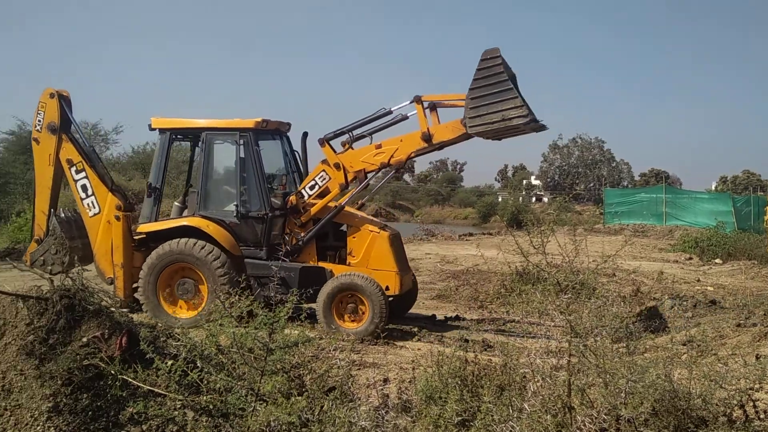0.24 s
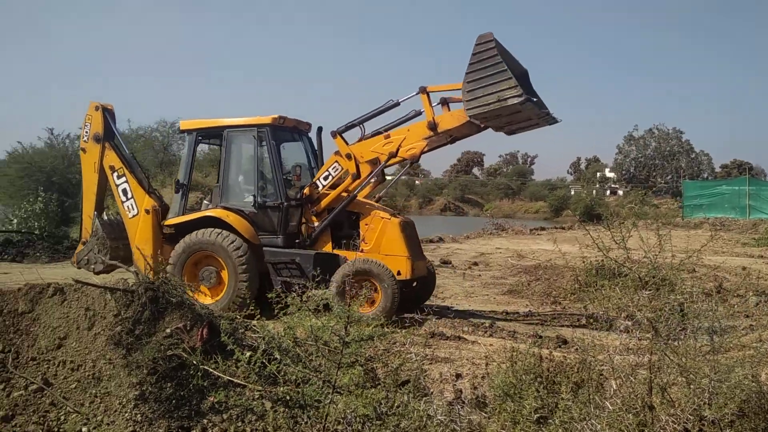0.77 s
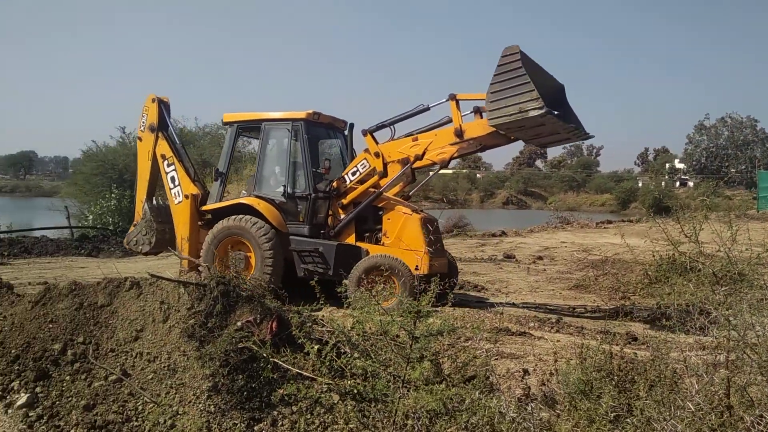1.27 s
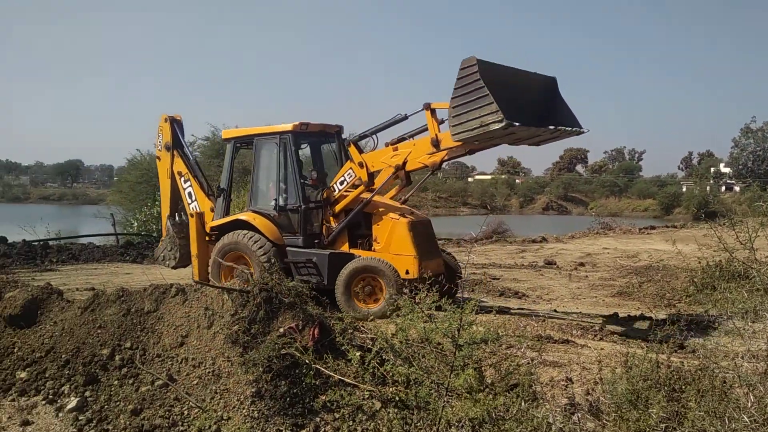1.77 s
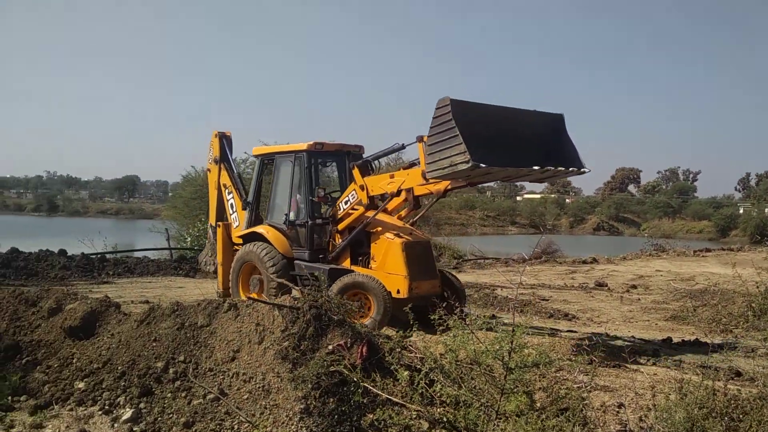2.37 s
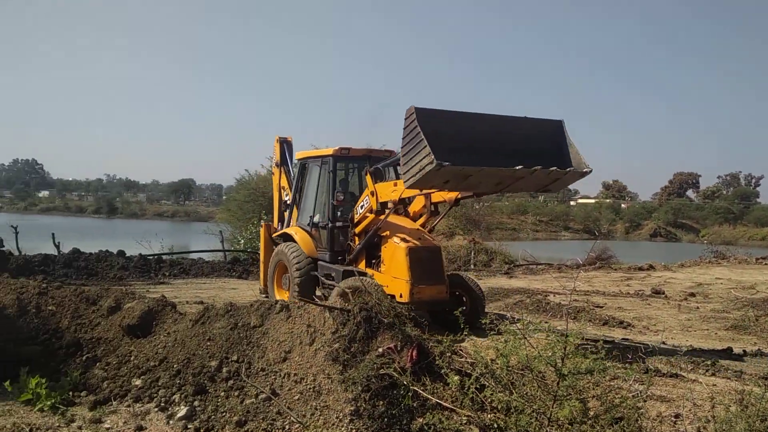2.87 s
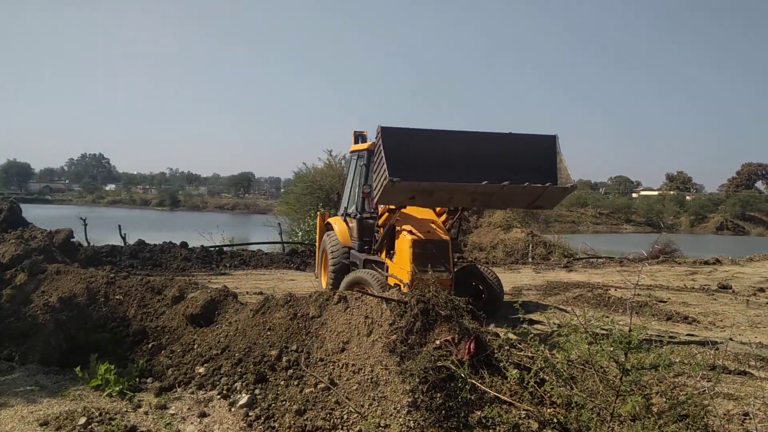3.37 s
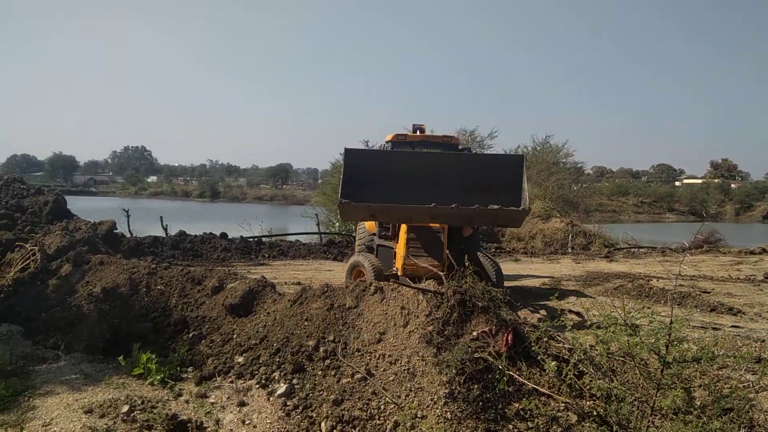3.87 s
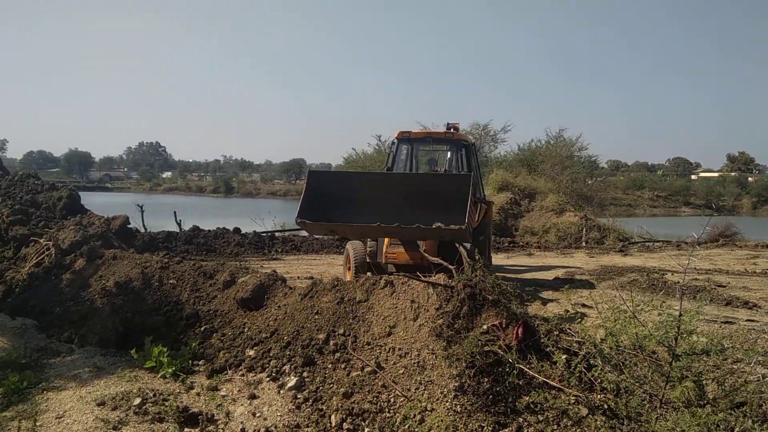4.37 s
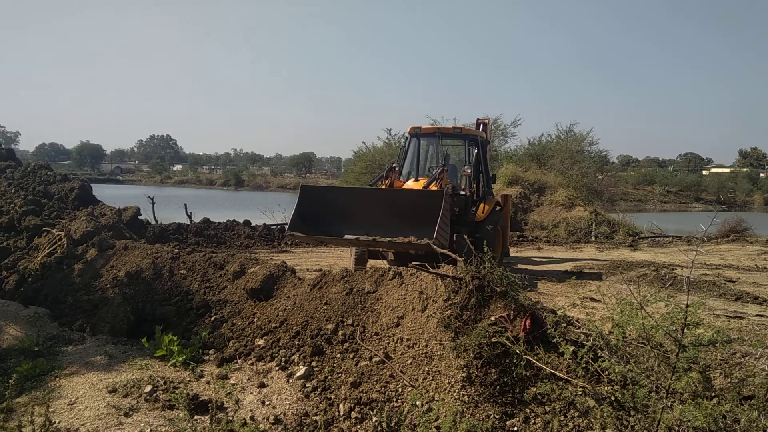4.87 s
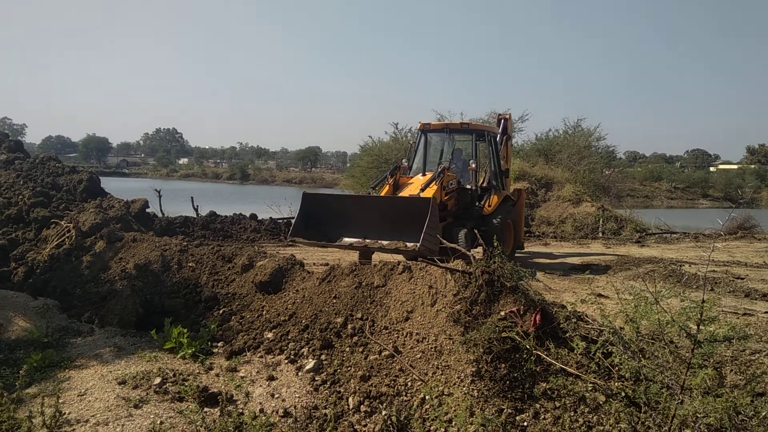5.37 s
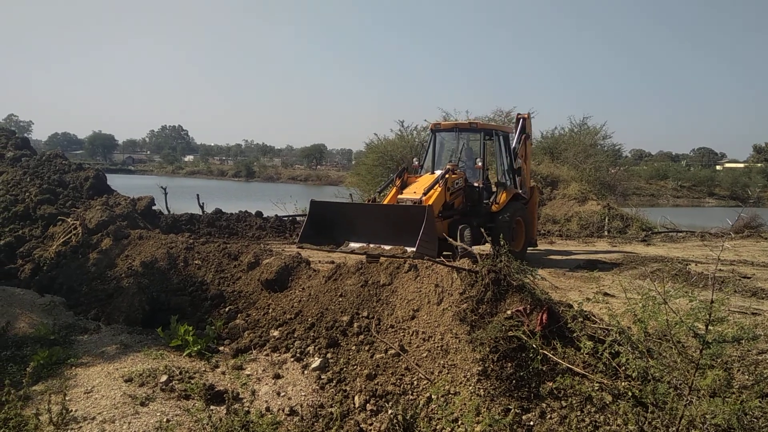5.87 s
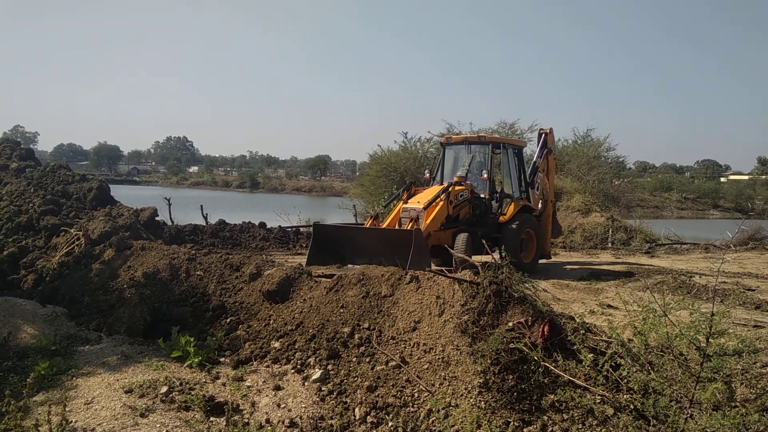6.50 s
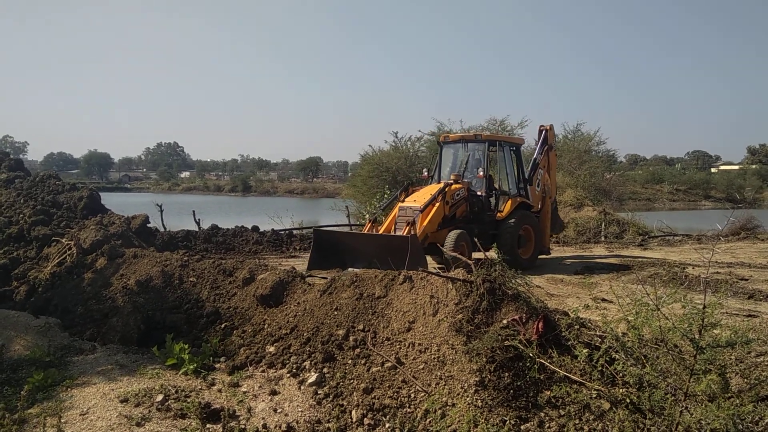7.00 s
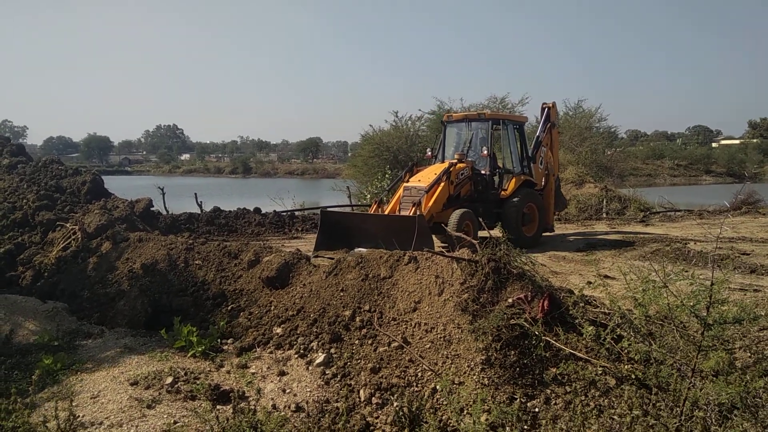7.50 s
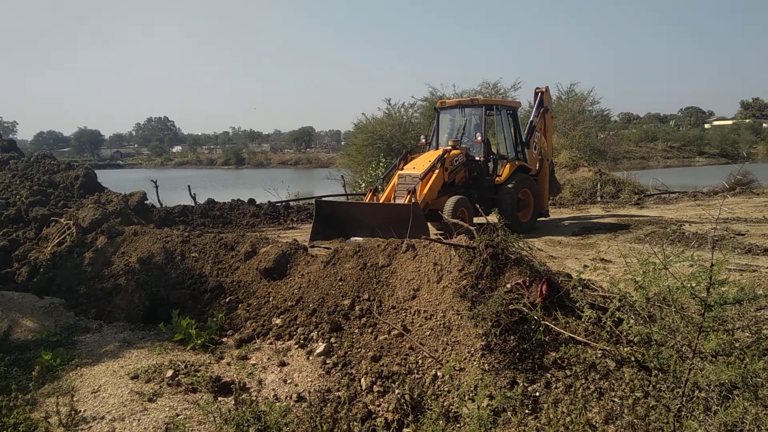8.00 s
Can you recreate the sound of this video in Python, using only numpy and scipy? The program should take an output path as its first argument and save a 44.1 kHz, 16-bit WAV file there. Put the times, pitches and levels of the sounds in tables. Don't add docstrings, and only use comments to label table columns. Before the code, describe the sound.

A four-cylinder diesel loader reverses on open soil some metres away, with fast low exhaust pulses, metallic knocking, gas hiss and a faint wavering gear whine. Around two and a half seconds it revs hard and spits, then falls through four seconds to a slow, uneven idle. Bucket and pins clank twice, then rattle sharply near seven seconds. Wind thumps the open stereo microphone, and dry stalks tick close by.

```python
import sys
import numpy as np
from scipy import signal
from scipy.fft import rfft, irfft, next_fast_len
from scipy.io import wavfile
from scipy.ndimage import uniform_filter1d

SR = 44100
rng = np.random.default_rng(int(sys.argv[2]) if len(sys.argv) > 2 else 0)


def generate_wav(signal):
    frames = np.transpose(np.atleast_2d(signal))
    scaled = np.clip(frames, -1, 1) * 32767
    pcm = np.round(scaled).astype(np.int16)
    wavfile.write(sys.argv[1], SR, pcm)


def linear_from_db(decibels):
    return 10 ** (np.asarray(decibels, float) / 20)


N = 363825
TAU = 2 * np.pi
FLANK_CYLINDERS_DB = [-3.5, -2, -9, -13]


def rms_one(x):
    return x / np.sqrt(np.mean(x ** 2) + 1e-20)


def in_time(rows):
    s, *columns = np.transpose(rows)
    return [np.interp(np.arange(N) / SR, s, c) for c in columns]


def at_hz(points, hz):
    points_hz, values = np.transpose(points)
    return np.interp(np.log(hz), np.log(points_hz), values)


def drift(rate_hz):
    r = np.exp(-80 * np.pi * rate_hz / SR)
    slow = signal.lfilter([1], [1, -2 * r, r * r], rng.standard_normal(N // 40 + 2002))[2000:]
    return np.interp(np.arange(N) / 40, np.arange(len(slow)), rms_one(slow))


def shaped(x, points):
    size = next_fast_len(N + SR // 10)
    hz = np.fft.rfftfreq(size, 1 / SR) + 1
    return irfft(rfft(x, size) * linear_from_db(at_hz(points, hz)), size)[..., :N]


def band(x, order, low_hz, high_hz):
    return signal.sosfilt(signal.butter(order, [low_hz, high_hz], "band", fs=SR, output="sos"), x)


def resonance(x, hz, width_hz):
    r = np.exp(-np.pi * width_hz / SR)
    poles = [1, -2 * r * np.cos(TAU * hz / SR), r * r]
    return signal.lfilter([(1 - r * r) / 2, 0, (r * r - 1) / 2], poles, x)


def bursts(times_s, gains, t60_s):
    clicks = np.zeros(N) + 1e-18
    np.add.at(clicks, np.minimum((np.asarray(times_s) * SR).astype(int), N - 1), gains)
    return signal.lfilter([1], [1, -linear_from_db(-60 / (t60_s * SR))], clicks)


def wind():
    # t/s, rms level/dB, flutter over thump/dB, port (0 left - 1 right)
    gusts = [(0.032, -17, -10, 0.78), (0.276, -19, -25, 1), (0.691, -17, -18, .95), (0.866, -11, -26, 0.97),
             (1.077, -6.5, -26, 1), (1.557, -10, -21, 0.87), (1.678, -12, -23, 0.45), (2.35, -11, -5, 0.85),
             (2.592, -12, -22, 0.043), (2.666, -9, -12, 0.5), (5.221, -18, -26, 0.28), (5.9, -24, -3, .05),
             (5.922, -13.5, -5, 0.046), (6.215, -27, -22, 0.44), (6.241, -23, -5, .15),
             (6.353, -14.5, -5, 0.082), (6.427, -13, -25, 0.78), (6.527, -14.5, -27, 0.88),
             (6.811, -12, -19, 1), (6.546, -19, -16, 0.7), (6.945, -16.5, 1, 0.59), (6.977, -24, 1, .5),
             (7.079, -27, -25, 0.98), (7.137, -11, -31, 1), (7.22, -22.5, 2, 1), (7.263, -10.5, -15, 1),
             (7.348, -13, 1, 0.027), (7.371, -18, 2.5, .03), (7.503, -21, -25, 0.25),
             (7.636, -23.5, -1, .1), (7.663, -19, -25, .03), (7.689, -22, -11, .1), (7.737, -18, -24, .05),
             (7.959, -20, -10, .05), (7.984, -19, -7, .05), (8.096, -22, -4, .15),
             (8.111, -14.5, -10, 0.17), (8.166, -14, -30, 0.72)]
    thump, flutter = rng.standard_normal((2, 2, N))
    thump = rms_one(band(thump, 2, 10, 140))
    flutter = rms_one(band(flutter, 3, 90, 360))
    out = linear_from_db(-35 + 3.3 * np.array([drift(5.3), drift(11.0)])) * thump
    t = np.arange(N) / SR
    thump_swing = .7
    for (s, db, flutter_db, port), hz in zip(gusts, rng.uniform(42, 75, 60)):
        port = np.clip(port, 0, 1)
        layers = ((thump, db, 1300, thump_swing), (flutter, db + flutter_db, 700, 0))
        for noise, level_db, half, swing in layers:
            i = np.arange(max(round(s * SR) - half, 0), min(round(s * SR) + half, N))
            swell = np.cos((i - s * SR) / half * np.pi / 2) ** 2
            lump = (1 - swing) * noise[:, i] - swing * np.sin(TAU * hz * (t[i] - s))
            lump = lump / np.sqrt(np.average(lump ** 2, axis=1, weights=swell ** 2))[:, None]
            out[:, i] += linear_from_db(level_db - 2.5) * swell * lump * [[1 - port], [port]]
    return out


def ticks():
    # t/s, peak level/dB
    snap_rows = [(4.279, -24), (4.2954, -33), (4.3355, -24), (4.3424, -29), (4.5104, -33), (4.5674, -34),
                 (4.6508, -34), (4.6634, -42), (7.1277, -43), (7.3477, -26), (7.3896, -30), (7.5122, -37)]
    # t/s, length/s, level/dB
    rustle_rows = [(7.726, .03, -64), (7.928, 0.079, -55), (8.033, 0.032, -64), (8.118, 0.057, -51.5)]
    s, db = np.transpose(snap_rows)
    t = np.arange(N) / SR
    stir = sum(linear_from_db(level_db) * np.exp(-((t - when) / length) ** 2) for when, length, level_db in rustle_rows)
    envelope = bursts(s, linear_from_db(db + 2.5), t60_s=0.013) + 3 * stir * linear_from_db(2.8 * drift(60))
    return band(envelope * rng.standard_normal((2, N)), 2, 7000, 16000)


def clanks():
    # t/s, peak level/dB, ring f/Hz, ring t60/s, crack over ring/dB
    clank_rows = [(0.297, -24, 1250, 0.12, 12.5), (1.261, -15.5, 1150, 0.13, -30),
                  (3.947, -17, 1150, 0.31, -22), (3.997, -21, 1190, 0.39, -18),
                  (6.9368, -9, 2320, 0.04, -8), (6.944, -14.5, 2250, 0.1, -5), (6.947, -18, 800, .04, -6),
                  (6.958, -21, 1600, .05, -6), (7.013, -24, 2480, 0.055, -2), (6.986, -24, 1500, 0.096, 5)]
    out, age = np.zeros((2, N)), np.arange(9000) / SR
    for s, db, hz, t60_s, crack_db in clank_rows:
        i, noise = round(s * SR), rng.standard_normal((2, 9000))
        crack = linear_from_db(crack_db - 60 * age / .13) * rms_one(band(noise, 3, 300, 3400))
        dull = .7 * min(1200 / hz, 1) ** 2 * resonance(noise, hz=760, width_hz=70)
        ring = rms_one(resonance(noise, hz, width_hz=170) + dull) * linear_from_db(-60 * age / max(t60_s, .02))
        out[:, i:i + 9000] += linear_from_db(db - 8.0) * (crack + ring)
    return out


def roar(turn, per_s, pulse_db, clatter_db, fuel):
    # f/Hz, level/dB per Hz
    roar_spectrum = [(20, 16), (60, 4), (120, 5.5), (200, 2.5), (350, 0.5), (550, -4), (800, -24.5)]
    roar_db = -8 + clatter_db + 0.043 * (pulse_db - clatter_db)
    roar_db += 9.5 * (1 - fuel) * np.clip((per_s - 30) / 15, 0, 1)
    gate = linear_from_db(roar_db + 6 + 1.2 * drift(4.9)) * (1 + 0.1 * np.cos(turn))
    return gate * rms_one(shaped(rng.standard_normal((2, N)), roar_spectrum))


def gears():
    # t/s, f/Hz, level/dB
    whine_rows = [(.1, 448, -50), (.3, 461, -40), (.45, 448, -39), (.55, 430, -45), (.75, 413, -34),
                  (.86, 420, -46), (1.05, 438, -44), (1.25, 400, -41), (1.38, 340, -43), (1.55, 290, -40),
                  (1.85, 320, -48), (2.0, 358, -41), (2.15, 366, -42), (2.27, 350, -50), (2.39, 305, -35),
                  (2.46, 295, -48)]
    hz, db = in_time([*whine_rows, (2.6, 304, -84)])
    phase = np.cumsum(TAU * hz * (1 + 0.0048 * drift(31)) / SR)
    return np.sqrt(2) * linear_from_db(db + 2 + 2 * drift(9.8)) * np.cos(phase)


def fan_and_pump(turn, per_s, clatter_db):
    # t/s, level/dB
    fan_hidden = [(1.1, 1), (2.0, -4), (2.6, -5), (3.7, -2.5), (4.2, 1)]
    # t/s, level/dB
    pump_rows = [(3.4, -53), (3.7, -41), (4.5, -54), (5.0, -49.5), (5.3, -44), (5.6, -47.5), (5.8, -65)]
    fan_db = -31 + 0.82 * (clatter_db + 25.5) - 1.9 * np.maximum(per_s - 44.5, 0)
    fan = linear_from_db(fan_db + in_time(fan_hidden)[0]) * np.cos(3.62 * turn)
    pump = linear_from_db(in_time(pump_rows)[0]) * np.cos(9.0 * turn)
    return np.sqrt(2) * (fan + pump)


def firing_times(turn):
    return np.flatnonzero(np.diff(np.floor(turn / TAU + .12))) / SR


def hard_firings(turn):
    # t/s, level over the surge/dB
    spits = [(2.632, 2), (2.654, 3.5), (2.677, 1.5), (2.828, 2), (2.992, 4), (3.012, 3), (3.155, 12.5)]
    s = firing_times(turn)
    start_s, attack_s, hold_s, release_s = 2.523, 0.12, 0.41, 0.34
    edges_s = start_s + np.cumsum([0, attack_s, hold_s, release_s])
    db = np.interp(s, edges_s, [-7.5, 0, 0, -41], left=-99, right=-99)
    db += 2 * rng.standard_normal(500)[:len(s)]
    for when, extra_db in spits:
        db[np.argmin(abs(s - when))] += extra_db
    envelope = bursts(s, linear_from_db(-18.5 + db), t60_s=.022)
    return uniform_filter1d(uniform_filter1d(envelope, size=220), size=200)


def firing_gate(turn, hard, level_db, spread_db, length, steady, blast_db):
    cycles = turn / TAU + .19
    strength = linear_from_db(spread_db * rng.standard_normal(500))[cycles.astype(int)]
    age = cycles % 1 / length
    stroke = strength * (age * np.exp(1 - age)) ** 2
    return linear_from_db(level_db) * rms_one(steady + stroke) + linear_from_db(blast_db) * hard


def hiss(turn, hard, per_s, clatter_db, fuel):
    # f/Hz, level/dB per Hz
    hiss_spectrum = [(3000, -37), (3700, 3), (4200, 8), (5300, 6), (6200, 0), (7300, 0.5), (9400, 3),
                     (10300, -11.5), (11000, -23), (13000, -17)]
    sizzle_spectrum = [(8500, -4.5), (10300, 1.5), (11800, -3.5), (12800, -2), (13600, -61), (14500, -32),
                       (15300, -50)]
    hiss_db = clatter_db - 17.5 + 4 * fuel
    sizzle_db = clatter_db - 35 + 24 * fuel
    sizzle_db -= 3 * (1 - fuel) * np.clip((per_s - 28) / 10, 0, 1)
    white = rng.standard_normal((2, N))
    low = firing_gate(turn, hard, hiss_db, spread_db=2.5, length=0.3, steady=1.5, blast_db=-22.0)
    top = firing_gate(turn, hard ** 2 / hard.max(), sizzle_db + 1.7 * drift(52),
                      spread_db=3.5, length=0.22, steady=0.93, blast_db=3.5)
    puffs = low * rms_one(shaped(white, hiss_spectrum)) + top * rms_one(shaped(white, sizzle_spectrum))
    shield = resonance(linear_from_db(4.0) * puffs + linear_from_db(6.0) * hard * white, hz=6250, width_hz=810)
    return puffs + shield


def blows(turn, level, cylinders_db):
    s = firing_times(turn)
    scatter_s = rng.uniform(0, .004, (500, 2))[:len(s)].T
    i = ((s + scatter_s) * SR).astype(int).clip(0, N - 1)
    db = 31.5 + np.resize(np.roll(cylinders_db, shift=-1), len(s))
    spread_db = 2.0 * rng.standard_normal((500, 2))[:len(s)].T
    out = np.zeros((2, N))
    out[[[0], [1]], i] = linear_from_db(db + spread_db) * level[i]
    return out


def sump(turn, pulse_db):
    struck = blows(turn, linear_from_db(pulse_db), FLANK_CYLINDERS_DB)
    return linear_from_db(6.5) * resonance(resonance(struck, hz=810, width_hz=370), hz=780, width_hz=90)


def panel_knocks():
    # t/s, peak level/dB, ring f/Hz
    surge_low = [(2.606, -13, 774), (2.63, -18, 790), (2.654, -12, 720), (2.653, -8.5, 340),
                 (2.677, -14, 820), (2.699, -15, 810), (2.742, -18, 810), (2.784, -11, 807),
                 (2.868, -14, 800), (3.012, -18, 630), (3.033, -12, 630), (3.114, -13, 776),
                 (3.151, -13.5, 810), (3.234, -20, 815), (3.279, -16, 795)]
    surge_mid = [(2.5843, -13, 1300), (2.6072, -13, 1210), (2.6324, -11, 1266), (2.654, -15, 1300),
                 (2.6315, -11.5, 1560), (2.652, -21, 1620), (2.675, -16, 1730), (2.696, -9.5, 1640),
                 (2.7173, -12, 1640), (2.739, -11, 1660), (2.765, -13, 1230), (2.7828, -13.5, 1340),
                 (2.808, -12, 1340), (2.828, -11, 1340), (2.8706, -18, 1380), (2.8881, -17, 1490),
                 (2.908, -24, 1180), (2.927, -11, 1660), (2.9519, -13, 1420), (3.01, -15, 1380),
                 (3.0522, -12.5, 1260), (3.2762, -22, 1370)]
    surge_high = [(2.5628, -29, 2680), (2.584, -22, 2600), (2.6062, -17, 2690), (2.652, -22, 2610),
                  (2.675, -14, 2570), (2.8282, -27, 2520), (2.8453, -11.5, 2570), (2.8671, -26, 2540),
                  (2.893, -25, 2470), (2.9276, -20, 2410), (3.0138, -25, 2700), (3.032, -19, 2610)]
    reversing = [(0.104, -9, 794), (0.198, -19, 850), (0.3, -12, 790), (0.525, -16, 1220),
                 (0.553, -16, 1100), (0.615, -17, 1200), (0.707, -14, 1220), (0.735, -8, 1150),
                 (0.798, -25, 1150), (0.823, -10.5, 1150), (0.894, -24, 1170), (1.262, -13, 1100),
                 (1.323, -28, 832), (1.355, -13, 1120), (1.405, -13, 1150), (1.445, -11, 1170),
                 (1.532, -20, 1200), (1.59, -10, 1164), (1.683, -20, 880), (1.773, -13, 1110),
                 (1.907, -20, 1220), (1.952, -15, 885), (2.02, -24, 1260), (2.115, -15, 1120),
                 (2.164, -20, 1220), (2.185, -24, 1280), (2.209, -18, 1210), (2.229, -16, 1230),
                 (2.279, -20, 1260), (2.299, -10, 1250), (2.351, -16, 1160), (2.373, -7.5, 1210),
                 (2.394, -13, 1250), (2.443, -13, 1200), (2.462, -15, 1120), (2.512, -17, 783)]
    idling = [(4.293, -26, 751), (4.326, -25, 748), (4.414, -21, 750), (4.467, -27.5, 740),
              (4.612, -33, 703), (4.72, -24.5, 740), (4.858, -27, 757), (5.03, -36, 810), (5.138, -34, 750),
              (5.174, -26, 738), (5.211, -28, 735), (5.282, -25, 740), (5.361, -29, 1020),
              (5.427, -36, 760), (5.459, -24, 740), (5.541, -26, 991), (5.57, -23, 736), (5.647, -26, 744),
              (5.722, -39, 958), (5.752, -38, 786), (5.787, -26, 760), (5.936, -24, 757), (6.011, -34, 790),
              (6.154, -52, 751), (6.195, -28, 754), (6.272, -29, 802), (6.312, -23, 726),
              (6.459, -24.5, 970), (6.579, -22, 976), (6.613, -28, 740), (6.736, -24, 975),
              (6.774, -25, 754), (6.861, -29, 985), (6.893, -26, 990)]
    idling_last = [(7.036, -28, 760), (7.092, -32, 990), (7.173, -33, 982), (7.254, -28, 990),
                   (7.416, -27, 974), (7.496, -30, 996), (7.534, -22, 962), (7.573, -24, 983),
                   (7.654, -33, 993), (7.694, -23.5, 975), (7.728, -28, 970), (7.895, -39, 1000),
                   (8.03, -32, 1010), (8.076, -28, 722)]
    groups = (([*surge_low, *surge_mid, *surge_high], 0.037, 3),
              (reversing, 0.068, -5),
              ([*idling, *idling_last], .08, -2.5))
    out, age = np.zeros((2, N + 4000)), np.arange(4000) / SR
    rise_s = .0016
    for rows, t60_s, trim_db in groups:
        envelope = (1 - np.exp(-age / rise_s)) * linear_from_db(-60 * age / t60_s)
        for s, db, hz in rows:
            i = round((s - rise_s) * SR)
            detune, phase = rng.uniform(-0.92, 1, (2, 2, 1))
            ring = np.sin(TAU * hz * (1 + 0.012 * detune) * age + np.pi * phase)
            out[:, i:i + 4000] += linear_from_db(db + trim_db) * envelope * ring
    return out[:, :N]


def body(shake, turn, level, modes, cylinders_db):
    out = 0
    for k, (hz, width_hz, db) in enumerate(modes):
        gain = (-1) ** k * linear_from_db(db + 0.35 * drift(1.0) + 1.62 * drift(11.2))
        struck = resonance(blows(turn, level, cylinders_db), hz, 1.46 * width_hz)
        out = out + gain * resonance(shake + struck, hz, width_hz)
    return out


def knock(turn, hard, knock_db):
    # f/Hz, width/Hz, level/dB
    side_on = [(805, 94, -0.5), (939, 15, 1.5), (1150, 89, 0.5), (1357, 37, 0), (1886, 123, -0.5),
               (2610, 180, -2)]
    quarter_on = [(632, 52, -6.5), (814, 32, 3.5), (1250, 140, -0.5), (1386, 19, 1.5), (1640, 120, -9.5),
                  (1935, 84, -2.5), (2520, 210, -2)]
    head_on = [(740, 31, 4), (1112, 43, -0.5), (1762, 14, 1.5), (2520, 100, -4)]
    far_panel = [(974, 28, 2.2)]
    # f/Hz, level/dB per Hz
    block_spectrum = [(400, -36), (600, -4), (1500, -6.5), (3000, -5.5), (3700, -13), (4600, -52)]
    front_db, far_db = [-3, -4, -10, 0], [-6, -5.5, -3, -1.5]
    swing, = in_time([(1.65, 0), (2.2, 1)])
    facing, = in_time([(3.32, 0.025), (4.2, 0.7)])
    past, = in_time([(3.2, .2), (5, 1)])
    gate = firing_gate(turn, hard, knock_db - 3, spread_db=1.5, length=.3, steady=.9, blast_db=-17.5)
    panels, block = rng.standard_normal((2, 2, N)) * gate
    level = linear_from_db(knock_db - 3) + .12 * hard
    late = turn - TAU * .3 * facing
    flank = np.sqrt(1 - swing) * body(panels, turn, level, side_on, FLANK_CYLINDERS_DB)
    flank += np.sqrt(swing) * body(panels, turn, level, quarter_on, FLANK_CYLINDERS_DB)
    front = body(panels[::-1], late, linear_from_db(4) * level, head_on, front_db)
    seen = np.sqrt(1 - facing) * flank + np.sqrt(facing) * front
    seen += past * body(panels, late, level, far_panel, far_db)
    return linear_from_db(15) * (seen + shaped(block, block_spectrum))


def exhaust(turn, per_s, pulse_db):
    # f/Hz, level/dB
    pipe = [(76, -15), (88, -9), (108, -1), (128, -5), (172, -14), (187, -5), (214, -5), (236, -24),
            (320, -22), (450, -30)]
    # multiple of firing rate, level/dB
    half_orders = [(.5, -19), (3.5, -33)]
    # t/s, level/dB
    rasp_rows = [(3.1, 0), (3.28, 11), (3.7, 2), (4.3, 2), (4.7, 0)]
    idle_cycles, pulling_cycles = [.43, 0, .08, -.3], [.36, .36, .38, .25]
    phase = [TAU * np.interp(per_s, [38.5, 41.4], pair) for pair in zip(idle_cycles, pulling_cycles)]
    first_db = pulse_db + 10.5 + .85 * np.minimum(per_s - 44, 0)
    out = linear_from_db(first_db) * np.cos(turn + phase[0]) + linear_from_db(pulse_db) * np.cos(2 * turn + phase[1])
    softer_db = .35 * np.clip(45 - per_s, 0, 11)
    rasp_db, = in_time(rasp_rows)
    for k in range(3, 10):
        waver_db = 1.6 * drift(1.5) + rasp_db * (k > 5) + .6 * rasp_db * (k == 3)
        tone_db = pulse_db + at_hz(pipe, k * per_s) - softer_db * (k - 2.5) + waver_db
        out += linear_from_db(tone_db) * np.cos(k * turn + phase[min(k, 4) - 1])
    for k, db in half_orders:
        out += linear_from_db(pulse_db + db + 3 * drift(2.5)) * np.cos(k * turn + .7 * drift(2.5))
    return np.sqrt(2) * out


def two_ports(pair):
    # f/Hz, likeness
    likeness = [(60, .93), (300, 0.93), (700, 0.85), (1400, 0.46), (3000, 0.66), (6000, 0.42), (12000, 0.2)]
    # f/Hz, left over right/dB
    balance = [(60, -16), (110, 2), (200, -0.5), (380, -0.5), (700, -1), (1290, 0.5), (2380, 10.5),
               (4400, 4.5), (8120, 14.5), (15000, 5)]
    left_lag_s = 4e-5
    size = next_fast_len(N + SR // 10)
    hz = np.fft.rfftfreq(size, 1 / SR) + 1
    sign = np.array([[1], [-1]])
    mid, side = rfft(pair, size)
    alike = np.clip(at_hz(likeness, hz), 0, 1)
    both = np.sqrt(1 + alike) * mid + np.sqrt(1 - alike) * side * sign
    lean = linear_from_db(at_hz(balance, hz) / 2 * sign)
    lead = np.exp(-1j * np.pi * hz * left_lag_s * sign)
    return irfft(both * lead * lean / np.sqrt((lean ** 2).sum(axis=0)), size)[:, :N]


def scene():
    # t/s, firings per s
    speed_rows = [(0.0, 44.4), (0.3, 44.92), (0.65, 43.74), (1.3, 43.46), (2.35, 42.87), (2.57, 41.45),
                  (2.72, 46.52), (3.05, 49.58), (3.3, 47.88), (3.68, 45.58), (3.87, 41.41), (4.2, 36.19),
                  (4.5, 33.14), (4.85, 28.83), (6.0, 26.84), (6.8, 25.37), (7.6, 25.03), (8.25, 22.21)]
    # t/s, exhaust pulse level/dB, clatter level/dB, fuelling (0 coasting - 1 pulling)
    engine_rows = [(0, -26.5, -23.5, 0.77), (.4, -28.5, -24.5, 0.89), (1.2, -28, -25, 0.95),
                   (1.6, -24.5, -24, 0.86), (2.1, -25, -23.5, 0.85), (2.45, -25, -24, 0.9),
                   (2.62, -20, -22, 0.6), (3.2, -21.5, -22.5, 0.79), (3.65, -25.5, -25.5, 0.66),
                   (3.82, -30.5, -29.5, 0.58), (4.15, -30, -31, 0.19), (4.7, -31, -36.5, 0.13),
                   (5.3, -30.5, -35, 0.058), (6.1, -32.5, -35, 0.58), (7.3, -29, -35, 0.72),
                   (7.7, -27.5, -36, 0.62), (7.85, -41, -38.5, 0.4), (8.25, -35, -35.5, 0.31)]
    # t/s, lead/cycles
    hunt_rows = [(3.9, 0), (4.3, -.07), (4.6, -.07), (4.9, -.2), (5.55, -.24), (6.1, -.07), (6.9, -.08),
                 (7.3, -.2)]
    per_s, = in_time(speed_rows)
    pulse_db, clatter_db, fuel = in_time(engine_rows)
    turn = TAU * np.cumsum(per_s) / SR + 2.5 + TAU * in_time(hunt_rows)[0]
    pulse_db = pulse_db + 1.3 * drift(4) * np.clip((34 - per_s) / 5, 0, 1)
    hard = hard_firings(turn + TAU * .05)
    early = turn + TAU * .16 * np.clip((per_s - 36) / 5.4, 0, 1)
    tones = exhaust(turn, per_s, pulse_db) + fan_and_pump(turn, per_s, clatter_db) + gears()
    engine = knock(early, hard, clatter_db) + hiss(early, hard, per_s, clatter_db, fuel)
    engine += roar(turn, per_s, pulse_db, clatter_db, fuel) + sump(early, pulse_db)
    near = two_ports(engine + panel_knocks() + clanks() + ticks())
    return tones * linear_from_db([[-.4], [.4]]) + near + wind()


def roll_off(x):
    return signal.sosfilt(signal.butter(12, 15820, fs=SR, output="sos"), x)


def record(dry):
    rounded = 1.15 * np.tanh(dry / 1.15)
    dulled = signal.sosfilt(signal.butter(4, 14000, fs=SR, output="sos"), rounded)
    return roll_off(dulled)


dry = scene()
out = record(dry)
generate_wav(out)
```